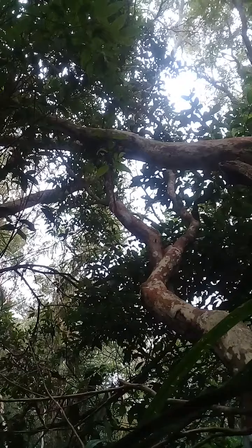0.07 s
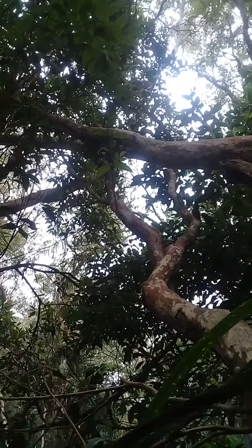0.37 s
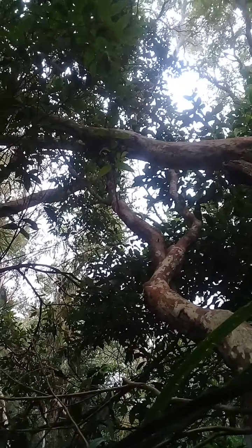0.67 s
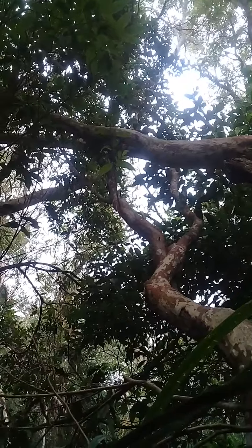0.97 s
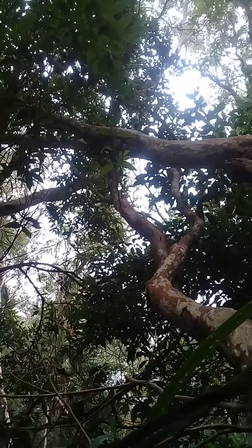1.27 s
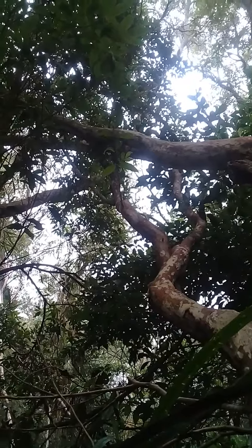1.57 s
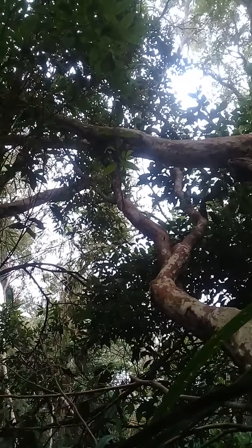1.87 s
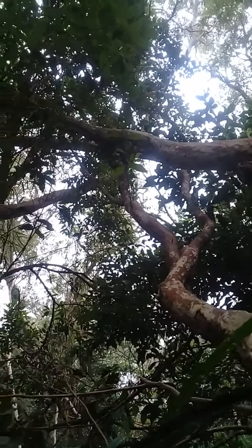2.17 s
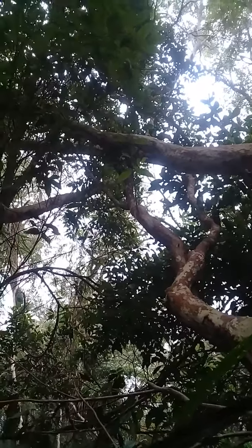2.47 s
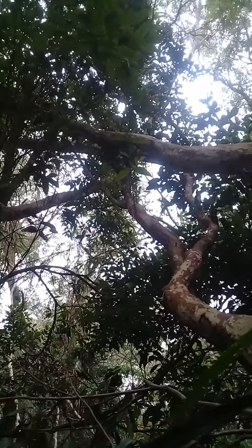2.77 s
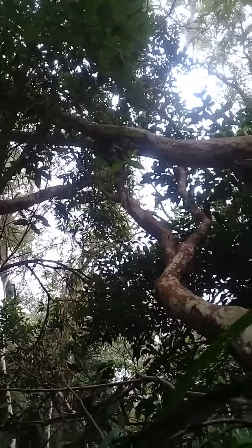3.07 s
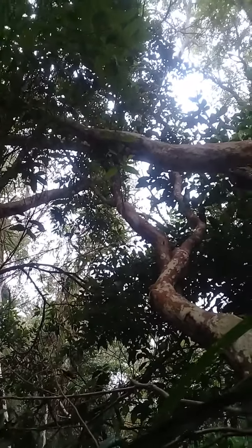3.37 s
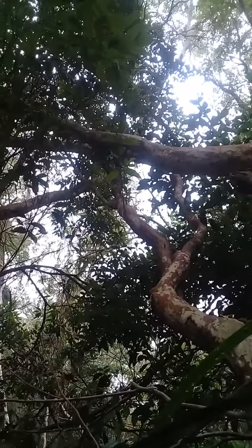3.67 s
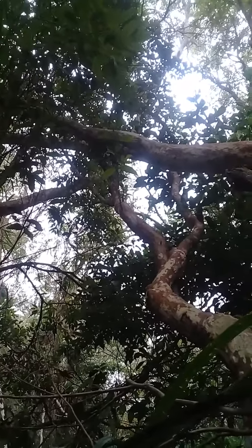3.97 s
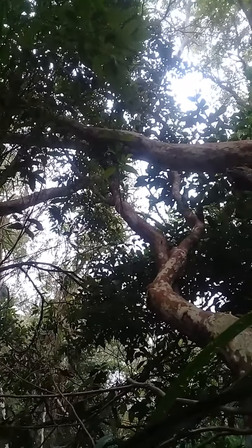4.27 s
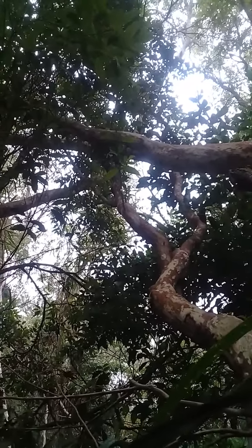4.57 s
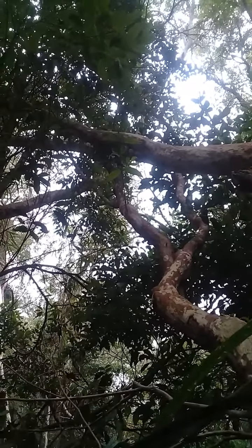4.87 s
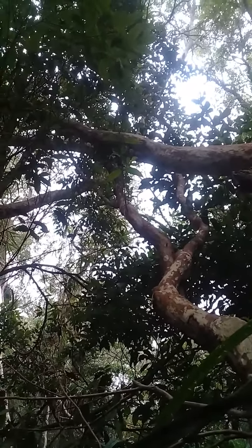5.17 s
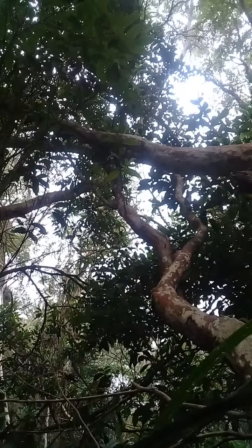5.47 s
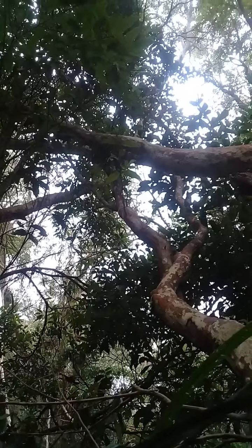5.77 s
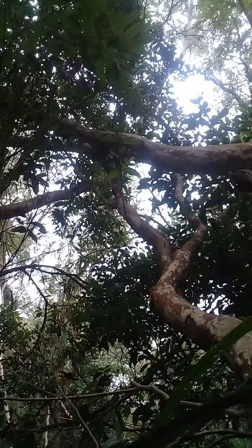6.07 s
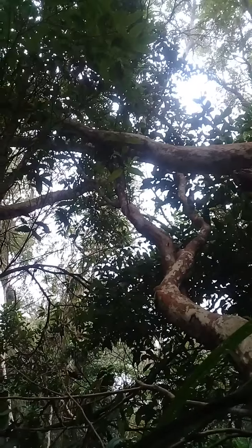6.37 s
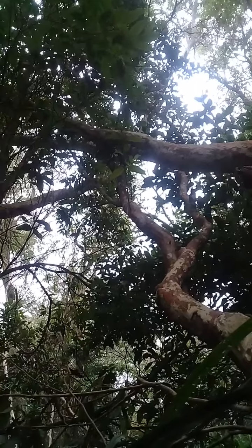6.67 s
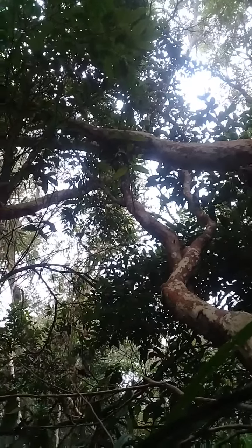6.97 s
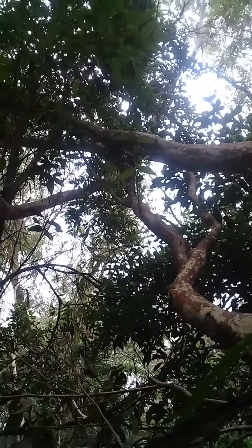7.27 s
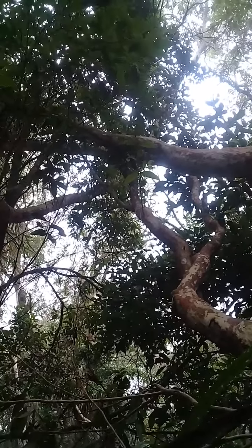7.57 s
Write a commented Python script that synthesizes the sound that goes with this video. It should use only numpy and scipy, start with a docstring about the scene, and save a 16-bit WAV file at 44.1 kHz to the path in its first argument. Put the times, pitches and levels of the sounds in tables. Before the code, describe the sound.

In a forest, a nearby bird gives two loud, clear whistles, the first rising and the second falling, with a sharp chip between them. Another bird purrs short, low trills, while farther birds twitter and twice sing a quickening phrase of arched notes. Twigs tick lightly now and then. Thin, high insects, a soft hiss and a distant rumble continue underneath, and each call echoes among the trees.

```python
"""Two loud, clear whistles from a near bird ring through a shady forest. A second bird snaps sharp
chips, a third purrs short low trills, and farther off others twitter and sing arched notes.
Each bird's voice is a nearly pure tone that bends in pitch. Some insects pulse in thin, high tones;
shaped noise makes the steady insect chorus, the ticking twigs and a distant rumble.
Trunks and leaves scatter every call into an echo."""
import sys
import numpy as np
from scipy import signal
from scipy.fft import rfft, irfft, next_fast_len
from scipy.io import wavfile
from scipy.ndimage import uniform_filter1d

SR = 44100
rng = np.random.default_rng(int(sys.argv[2]) if len(sys.argv) > 2 else 0)


def transcribe(signal):
    """Save signal, clipped to [-1, 1], as a 16-bit WAV file at the path in sys.argv[1]."""
    frames = np.atleast_2d(signal).T
    limited = np.clip(frames, -1, 1)
    pcm = np.round(limited * 32767).astype(np.int16)
    wavfile.write(sys.argv[1], SR, pcm)


N = 336483


def whistles():
    """The near bird's two whistles: the first glides up, the second down."""
    # end/s, length/s, first f/Hz, last f/Hz, middle of the glide/s, glide length/s, level/dB, echo/dB
    rising, falling = [(.21, .25, 2428, 2687, .108, 0.191, -33.5, -2.5),
                       (.826, .374, 2402, 2198, .705, .26, -35.5, -8.5)]
    # overtones of each whistle: multiple of the pitch, level/dB
    rising_overtones = [(2, -22.5), (3, -32.5), (4, -34.5), (5, -20.5), (6, -26.5)]
    falling_overtones = [(2, -28), (3, -42), (4, -53.5), (5, -58), (6, -31.5), (7, -33.5)]
    return whistle(*rising, rising_overtones) + whistle(*falling, falling_overtones)


def whistle(end, length, first_hz, last_hz, middle_s, glide_s, db, echo_db, overtones):
    """A clear note scoops up, glides and drops; its echo beats against it and smears the overtones."""
    start = end - length
    t = np.arange(start, end, 1 / SR)
    glide = (1 + np.sin(np.pi * np.clip((t - middle_s) / glide_s, -.5, .5))) / 2
    scoop = .35 * np.exp((start - t) / .011)
    drop = .31 * np.exp((t - end) / .0073)
    hz = (first_hz + (last_hz - first_hz) * glide) * (1 - scoop - drop)
    level = db - 120 * (scoop + drop)  # the slides at both ends are faint
    pure, shine = np.zeros((2, N))
    early = SR // 2  # room for a note that is already under way
    at = start + early / SR
    note = tone(hz, level, jitter=.0015)
    add(pure, at, note)
    add(pure, at + .046, gain_of(-14) * note)  # one clear bounce off a trunk
    shine_db = level + 85 * (hz / hz.max() - 1)  # overtones grow as the note nears its top
    add(shine, at, tone(hz, shine_db, overtones, jitter=.005))
    body = pure + gain_of(echo_db) * echo(pure, near_s=.078, far_db=-7.5)
    heard = body + gain_of(-7) * shine + echo(shine, near_s=.05, far_db=-10)
    return np.pad(heard[early:], (0, early))


def chips(shadow_ratio=1.35, shadow_db=-11, shine_db=-25.5):
    """A sharp chip plunges, shadowed a moment later by a fainter, higher sweep."""
    # the chips: t/s, level/dB
    calls = [(0.295, -46), (5.866, -42.5)]
    # the path of one chip: t/s, f/Hz, level/dB
    path = [(0, 4500, -14), (.007, 3950, -7.5), (.014, 3681, -1), (.021, 3400, -2), (.028, 2950, -2),
            (0.032, 2300, -16.5), (0.04, 1300, -37.5)]
    path_s, path_hz, path_db = np.transpose(path)
    t = np.arange(0, path_s[-1], 1 / SR)
    hz, swell_db = np.interp(t, path_s, path_hz), np.interp(t, path_s, path_db)
    late_fade_in = np.clip(t / .0086 - 1, 0, 1)
    out, shine = np.zeros((2, N))
    for s, db in calls:
        level = db + swell_db
        add(out, s, tone(hz, level, jitter=.012))
        shadow = tone(hz * shadow_ratio, level + shadow_db, jitter=.026) * late_fade_in
        add(out, s + .002, shadow)
        overtones = tone(hz, level + shine_db, [(2, -1), (3, 0), (4, -1.4)], jitter=.078)
        add(shine, s, shadow + overtones)  # the shadow also scatters from the leaves; the overtones are heard only as that scatter
    return out + echo(out + shine, near_s=.064, far_db=-24)


def purrs(length_s=.064, throb_hz=84, top_hz=1570, full_effort_db=-45.5):
    """Low trills: pitch and loudness dip together, and louder trills swing wider and sound huskier."""
    # the trills: t/s, level/dB, length of the note held afterwards/s
    trills = [(1.029, -45, .32), (2.598, -76, 0), (3.314, -57, 0.09), (5.805, -55, 0.013),
              (6.44, -54.5, .12), (6.815, -64, 0.032), (7.565, -66, 0)]
    out, t = np.zeros(N), np.arange(0, length_s, 1 / SR)
    dip = 1 + np.cos(2 * np.pi * throb_hz * t)
    swell = np.sin(np.pi * (.11 + .6 * t / length_s)) ** 1.3
    for s, db, held_s in trills:
        effort_db = db - full_effort_db
        swing_hz, husk_db = 136.9 * gain_of(.465 * effort_db), 2.1 * effort_db
        hz = top_hz - swing_hz * dip
        add(out, s, swell * (1 - .36 * dip) * tone(hz, db, jitter=.005))
        # the husky overtones sound on through the dips
        add(out, s, swell * tone(hz, db - 10.5 + husk_db, [(2, -.5), (3, -12.5)], jitter=.014))
        if held_s > .02:
            add(out, s + length_s, held_note(held_s, db - 17.5, octave_db=2.5 + husk_db))
    return out + gain_of(-8) * echo(out, near_s=.037, far_db=-8.5)


def held_note(length, db, octave_db, first_hz=1533, sag_hz_per_s=130, fade_db_per_s=7.5):
    """A held note sags a little; its overtone, an octave higher, dies away first."""
    t = np.arange(0, length, 1 / SR)
    hz, level = first_hz - sag_hz_per_s * t, db - fade_db_per_s * t
    return tone(hz, level, jitter=.024) + tone(2 * hz, level + octave_db - 82 * t, jitter=.004)


def arched_song():
    """A bird sings four arched notes that quicken and climb, with two soft slides before the last."""
    # the notes: peak after the first peak/s, length/s, top f/Hz, level/dB
    song = [(0, .195, 2857, -56.5), (0.416, .22, 3137, -58), (0.728, .12, 3190, -58),
            (.936, .066, 3296, -67.5)]
    # each time it is sung: first peak/s, level change/dB, growth/(dB per s), note length factor
    repeats = [(3.495, -1, 1, .97), (6.651, -4, 13.5, 1.07)]
    # slide down after the third note: gap/s, length/s, first f/Hz, middle f/Hz, last f/Hz
    gap_s, *fall = (.002, .036, 2850, 2540, 2330)
    # slide up into the last note: time before its peak/s, length/s, first f/Hz, middle f/Hz, last f/Hz
    lead_s, *rise = (.066, .058, 2230, 2450, 2700)
    out = np.zeros(N)
    for start, song_db, growth, stretch in repeats:
        notes = [(start + at, length * stretch, top_hz, db + song_db + growth * at)
                 for at, length, top_hz, db in song]
        for peak, length, top_hz, db in notes:
            add(out, peak - length * .52, arch(length, top_hz, db))
        (third_peak, third_length, _, third_db), (last_peak, _, _, last_db) = notes[-2:]
        add(out, third_peak + third_length / 2 + gap_s, slur(*fall, third_db - 10))
        add(out, last_peak - lead_s, slur(*rise, last_db - 4))
    return out + gain_of(-5) * echo(out, near_s=.038, far_db=-18)


def arch(length, top_hz, db, rasp=.017):
    """A note that climbs cleanly and sinks with a slight rasp, loudest at its top."""
    # the pitch curve: share of the note gone by, factor on the top pitch
    curve = [(0, .75), (.24, .86), (.38, .96), (.52, 1.005), (.68, .97), (.86, .88), (1, .77)]
    progress = np.linspace(0, 1, int(length * SR))
    bend = uniform_filter1d(np.interp(progress, *np.transpose(curve)), size=500)
    swell_db = 4 + 46 * (bend - 1) + 4.5 * (progress - .5)  # the fall is louder than the climb
    note = tone(top_hz * bend, db + swell_db, [(1, -3.5), (2, -35)], jitter=.0041 + rasp * progress ** 2)
    return note * signal.windows.tukey(len(note), .16)


def small_birds(pip_s=.015):
    """Small birds twitter one phrase, whole or cut short, and drop single pips."""
    # the twitters: t/s, level/dB, pitch factor, time factor, number of notes sung
    twitters = [(1.268, -57, 1.02, 1.03, 3), (2.038, -64.5, .9, .8, 2), (2.664, -63.5, 1.01, 1.02, 3)]
    # the phrase (a dip, a fall, a rise): t/s, length/s, first f/Hz, middle f/Hz, last f/Hz, level/dB
    phrase = [(0, .045, 3554, 2700, 3150, 0.5), (0.051, .029, 3004, 2490, 2150, -5.5),
              (0.113, .056, 2090, 2480, 2600, -9)]
    # the pips: t/s, top f/Hz, level/dB
    pips = [(.566, 2987, -60.5), (1.2, 2750, -56.5), (1.348, 2900, -62), (1.91, 2775, -64),
            (1.932, 2804, -66.5), (2.072, 2540, -56.5), (7.548, 5280, -58.5)]
    out = np.zeros(N)
    for s, db, pitch, stretch, count in twitters:
        for at, length, first, middle, last, note_db in phrase[:count]:
            note = slur(length * stretch, first * pitch, middle * pitch, last * pitch, db + note_db)
            add(out, s + at * stretch, note)
    for s, hz, db in pips:
        add(out, s, slur(pip_s, .91 * hz, hz, .91 * hz, db))
    return out + gain_of(-6) * echo(out, near_s=.023, far_db=-23)


def upsweep(start_s=6.41, length_s=.095, first_hz=5850, rise_hz=3060, db=-65):
    """One thin, high call holds its pitch, then whips upward as it fades."""
    out, t = np.zeros(N), np.arange(0, length_s, 1 / SR)
    hz = first_hz + rise_hz * np.exp((t - length_s) / .034) * (t / length_s) ** 2
    add(out, start_s, tone(hz, db, jitter=.0072) * np.sin(np.pi * t / length_s))
    return out + gain_of(-2) * echo(out, near_s=.06, far_db=4)


def raspy_slides(length_s=.047):
    """Faint, raspy, echoing slides: some far calls, some the husk of the arched song."""
    # the slides: t/s, middle f/Hz, glide/octaves, level/dB
    slides = [(1.095, 3840, .15, -63.5), (3.42, 4040, 0.18, -66.5), (3.51, 3820, -0.36, -69),
              (5.02, 6350, 0.13, -82), (5.16, 3180, -0.48, -76), (5.771, 6370, -0.26, -78),
              (6.474, 7610, 0.4, -73), (7.001, 5780, -.05, -77), (7.219, 3280, -0.49, -71),
              (7.361, 3780, 0.24, -65), (7.411, 5360, 0.49, -66.5)]
    out = np.zeros(N)
    for s, hz, octaves, db in slides:
        step = 2 ** (octaves / 2)
        add(out, s, slur(length_s, hz / step, hz, hz * step, db, jitter=.075))
    return echo(out, near_s=.083, far_db=-17)


def twig_ticks(width_octaves=.6):
    """Twigs and leaves tick: each tick is a fast-dying puff of noise around one pitch."""
    # the ticks: t/s, level/dB, f/Hz, rise time/s, bright snap/dB
    ticks = [(1.204, -55.5, 2750, 0.0024, -34), (1.427, -65, 1606, 0.0042, -34),
             (1.876, -69.5, 1791, 0.0022, -21), (2.98, -71.5, 3920, 0.007, -15),
             (3.025, -70.5, 3500, 0.0054, -16), (3.958, -57.5, 2400, 0.0015, -17),
             (3.991, -61, 2250, .0033, -14), (6.288, -72, 2740, 0.0036, -24),
             (7.305, -62, 2420, 0.0019, -19), (7.551, -61, 4370, .005, -38)]
    out, t = np.zeros(N), np.arange(8192) / SR
    hz = np.fft.rfftfreq(len(t), 1 / SR) + 1
    for s, db, pitch, rise_s, snap_db in ticks:
        band = np.exp(-(np.log2(hz / pitch) / width_octaves) ** 2)
        lows = .45 / (1 + (hz / pitch) ** 4)
        puff = evened(irfft(rfft(rng.standard_normal(len(t))) * (band + gain_of(snap_db) + lows)))
        swell = t / rise_s * np.exp(1 - t / rise_s)
        add(out, s, gain_of(db) * puff * swell)
    return out + gain_of(-5) * echo(out, near_s=.038, far_db=-19)


def pulsed_insects():
    """Insects pulse in even runs of thin, high, falling notes."""
    # the runs: start/s, end/s, notes per second, first f/Hz, last f/Hz, fall in a note/Hz, level/dB
    runs = [(0.05, 1.506, 9.4, 6020, 5846, 90, -75.5), (1.549, 3.038, 9.7, 5820, 5990, 201, -90.5),
            (4.154, 5.601, 14, 5390, 4990, 144, -79), (6.067, 7.635, 7.9, 5450, 5440, 580, -75)]
    out = np.zeros(N)
    for start, end, rate, first_hz, last_hz, fall_hz, db in runs:
        t = np.arange(0, end - start, 1 / SR)
        progress = t * rate % 1  # goes from 0 to 1 in each note
        hz = np.linspace(first_hz, last_hz, len(t)) + fall_hz * (.5 - progress)
        add(out, start, tone(hz, db, jitter=.01) * np.sin(np.pi * progress) ** 2)
    return out + gain_of(-1) * echo(out, near_s=.09, far_db=-12)


def insect_chorus(flutter_db=2.5):
    """Many far insects blur into narrow bands of noise, each fluttering on its own."""
    # the bands: f/Hz, width/Hz, level/dB
    bands = [(4130, 150, -88), (4352, 140, -74), (4525, 60, -77.5), (4570, 180, -74.5), (5623, 33, -89.5),
             (5210, 900, -80)]
    out = np.zeros(N)
    for hz, width, db in bands:
        loudness = gain_of(db + flutter_db * waver(N, 25))
        out += loudness * noise(lambda f: np.exp(-np.log(4) * ((f - hz) / width) ** 2))
    return out


def background(rumble_db=-68.5, hiss_db=-74):
    """A distant rumble, alike in both ears, and a soft hiss whose high part spreads wider."""
    # how strong the rumble and the hiss are at each pitch: f/Hz, relative level/dB
    rumble_shape = [(20, -22), (40, -12), (62, -3.5), (90, 1.5), (115, 0.5), (160, -3.5), (210, -13),
                    (330, -18), (600, -26.5), (1500, -50.5)]
    hiss_shape = [(20, -11), (300, 2), (700, 1.5), (1500, -0.5), (2800, -3), (4000, -5.5), (5800, -13.5),
                  (6500, -10.5), (9000, -9.5), (12000, -8), (16000, -11.5)]
    # how alike the hiss is in both ears: f/Hz, likeness from 0 to 1
    likeness = [(50, 0.98), (500, 0.98), (4500, 0.99), (6500, 0.28), (8500, 0.17), (11000, 0.27),
                (15000, 0.5)]
    rumble = noise(lambda f: gain_of(read(rumble_shape, f))) * gain_of(rumble_db + .6 * waver(N, 4))
    hz = np.fft.rfftfreq(N, 1 / SR)
    same = read(likeness, hz)
    hiss = rfft(rng.standard_normal((2, N))) * gain_of(read(hiss_shape, hz))
    middle, side = hiss * np.sqrt([1 + same, 1 - same])
    return rumble + gain_of(hiss_db) * evened(irfft([middle + side, middle - side], N))


def echo(x, near_s, far_db):
    """A quick scatter from near trunks and leaves, then a long tail from the far ones."""
    # how long the forest rings: f/Hz, time to fade by 60 dB/s
    ring_times = [(500, 0.39), (1500, 1), (2500, 0.97), (4000, 0.88), (8000, 0.81), (15000, 0.37)]
    bounces = rng.standard_normal(SR) * (rng.random(SR) < 3000 / SR)
    hz, t, spectrum = signal.stft(bounces, SR, nperseg=256)
    fade = (np.exp(-t / near_s) + gain_of(far_db)) * gain_of(-60 * t / read(ring_times, hz)[:, None])
    build_up = 1 - np.exp(-t / .0074)
    tail = signal.istft(spectrum * fade * build_up, SR, nperseg=256)[1]
    return signal.fftconvolve(x, tail / np.linalg.norm(tail))[:N]


def tone(hz, db, partials=((1, 0),), jitter=.002):
    """A tone on a slightly shaky pitch; each partial is (multiple of the pitch, level/dB)."""
    phase = 2 * np.pi * np.cumsum(hz * (1 + jitter * waver(len(hz), 300))) / SR
    wave = sum(gain_of(level) * np.sin(k * phase) for k, level in partials)
    return np.sqrt(2) * gain_of(db) * wave * signal.windows.tukey(len(hz), min(1, 200 / len(hz)))


def slur(length, first_hz, middle_hz, last_hz, db, jitter=.0096):
    """A short note that slides through three pitches."""
    progress = np.linspace(0, 1, int(length * SR))
    hz = np.polyval(np.polyfit([0, .5, 1], [first_hz, middle_hz, last_hz], 2), progress)
    return tone(hz, db, jitter=jitter) * signal.windows.tukey(len(hz), .35)


def noise(gain):
    """Noise of average strength 1, shaped across the pitches by gain(Hz)."""
    size = next_fast_len(N, True)
    spectrum = rfft(rng.standard_normal(size)) * gain(np.fft.rfftfreq(size, 1 / SR))
    return evened(irfft(spectrum, size)[:N])


def waver(size, rate):
    """A random curve that heads for a new value rate times a second."""
    knots = rng.standard_normal(int(size / SR * rate) + 2)
    return np.interp(np.arange(size) / SR * rate, np.arange(len(knots)), knots)


def gain_of(db):
    """Turns decibels into a factor to multiply by."""
    return 10 ** (np.asarray(db) / 20)


def evened(x):
    """Scales a sound to an average strength (rms) of 1."""
    return x / np.sqrt(np.mean(x ** 2) + 1e-20)


def read(points, hz):
    """Reads between the rows of a (f/Hz, value) table, on a scale of octaves."""
    f, value = np.transpose(points)
    return np.interp(np.log(hz + 1), np.log(f + 1), value)


def add(mix, s, sound):
    """Adds a sound into the mix at s seconds."""
    part = mix[max(round(s * SR), 0):][:len(sound)]
    part += sound[:len(part)]


def scene():
    """All the voices of the forest together."""
    birds = whistles() + purrs() + arched_song() + chips() + small_birds() + upsweep() + raspy_slides()
    return birds + pulsed_insects() + twig_ticks() + insect_chorus() + background()


def record(dry, edge_hz=15750):
    """Cuts away the very highest treble."""
    low_pass = signal.firwin(511, edge_hz, window=("kaiser", 9), fs=SR)
    return signal.oaconvolve(dry, low_pass[None], "same")


dry = scene()
out = record(dry)
transcribe(out)
```